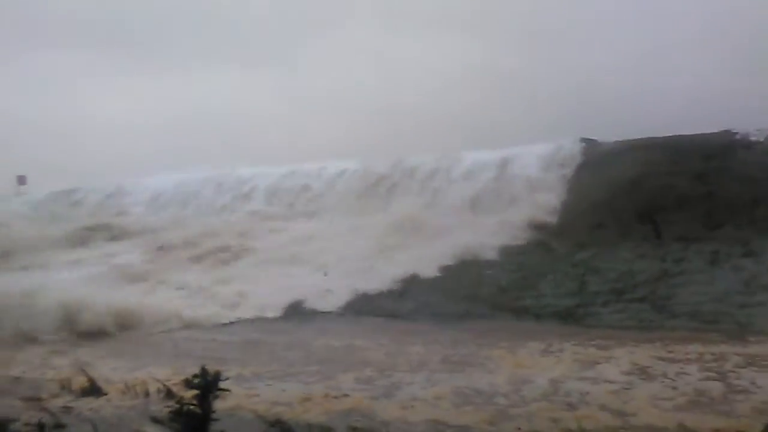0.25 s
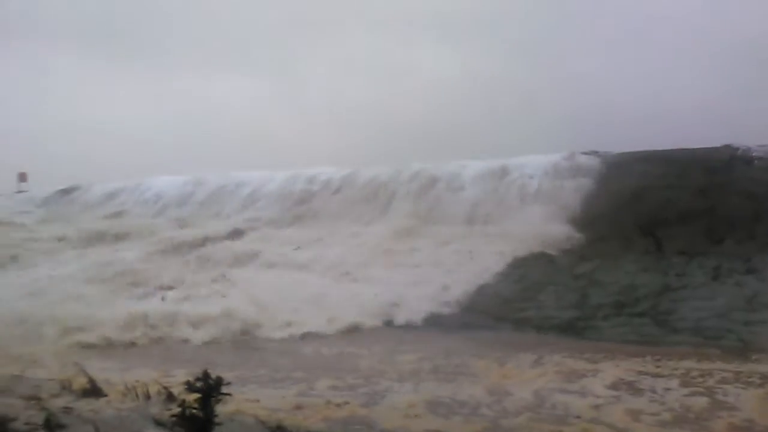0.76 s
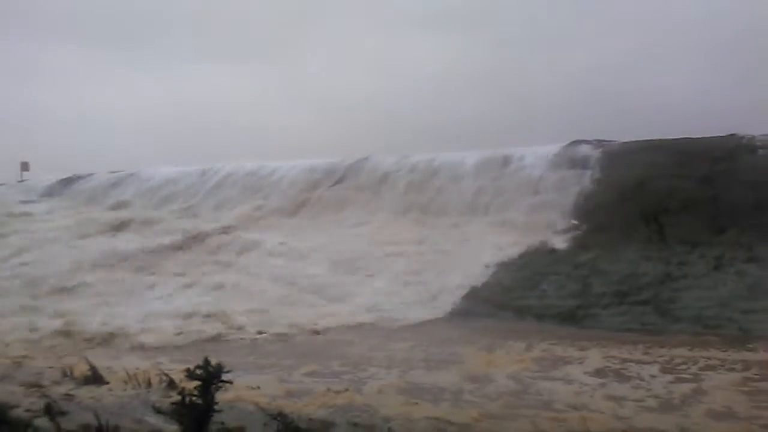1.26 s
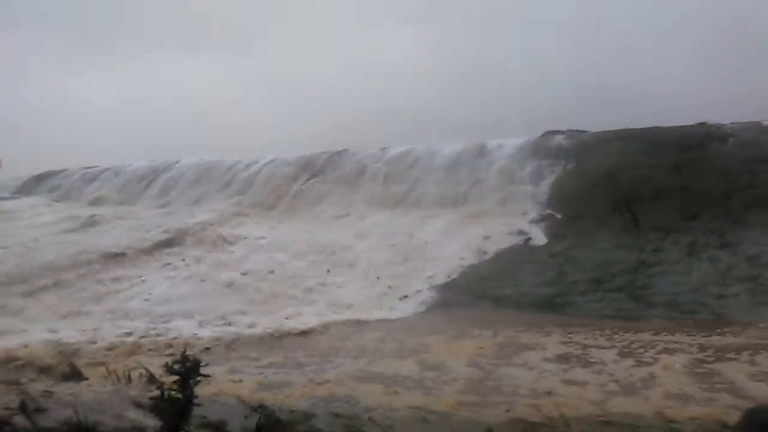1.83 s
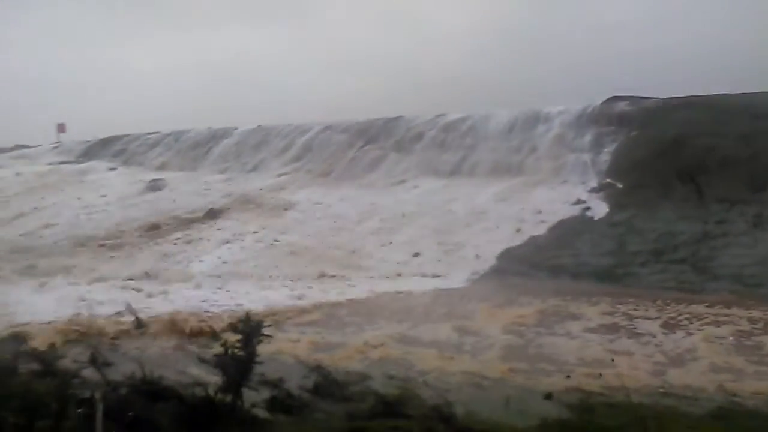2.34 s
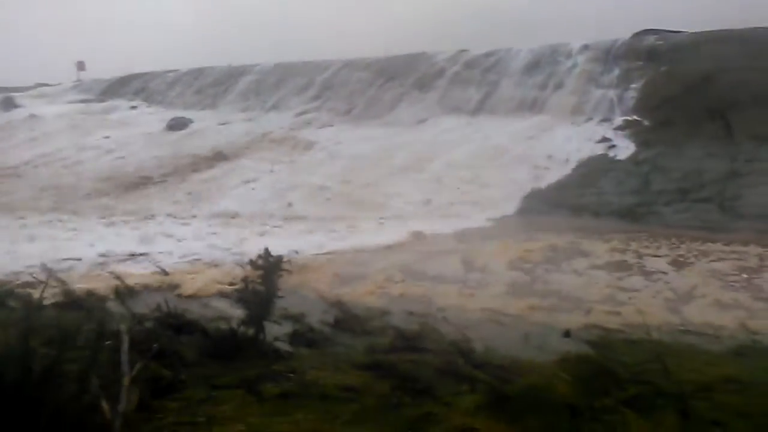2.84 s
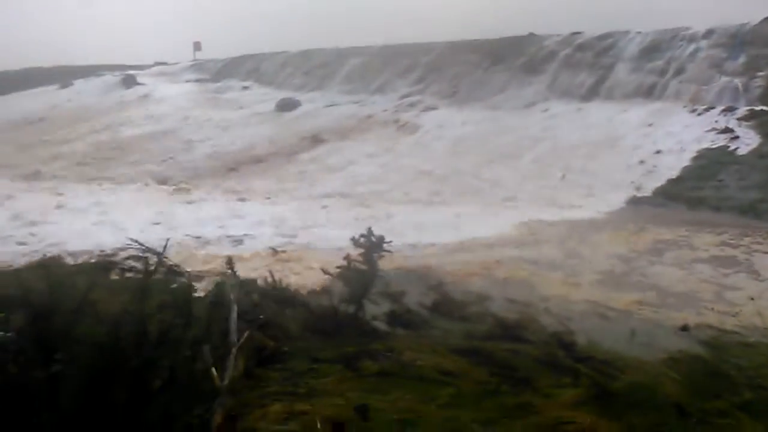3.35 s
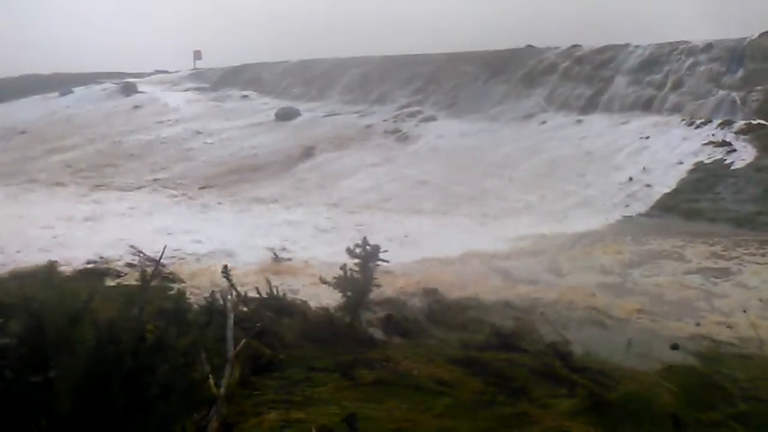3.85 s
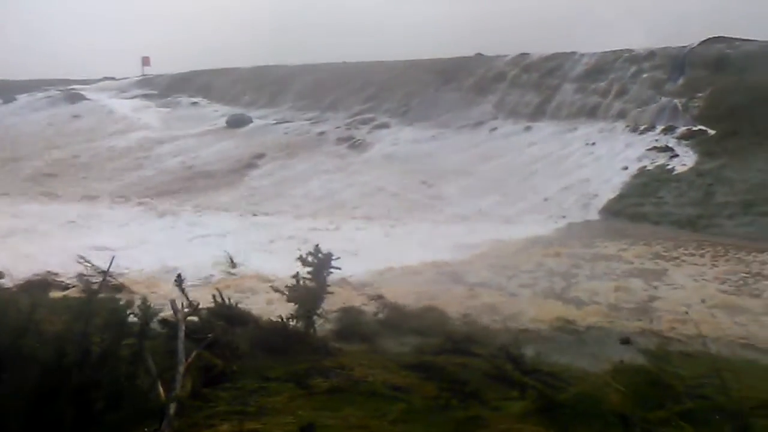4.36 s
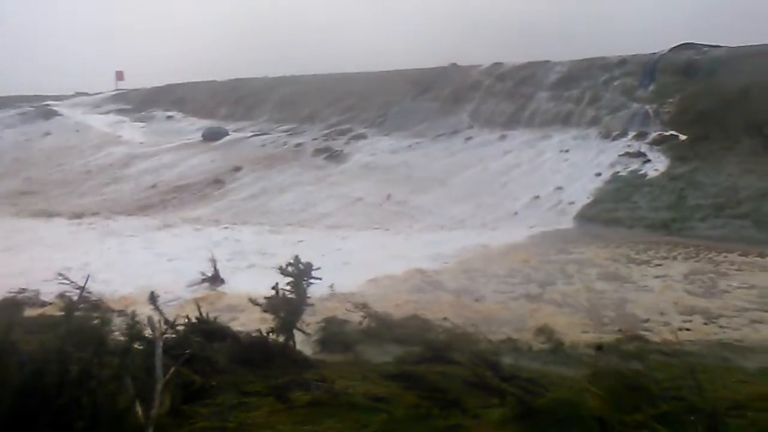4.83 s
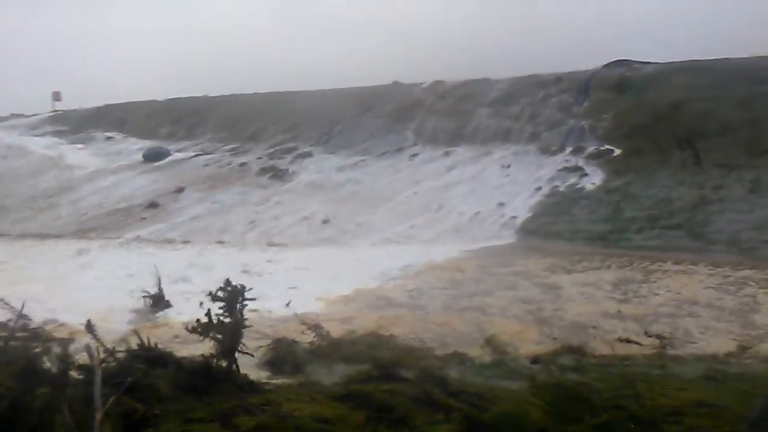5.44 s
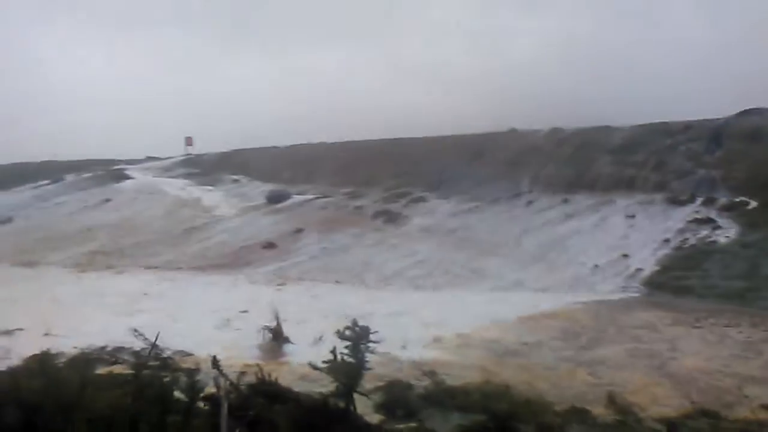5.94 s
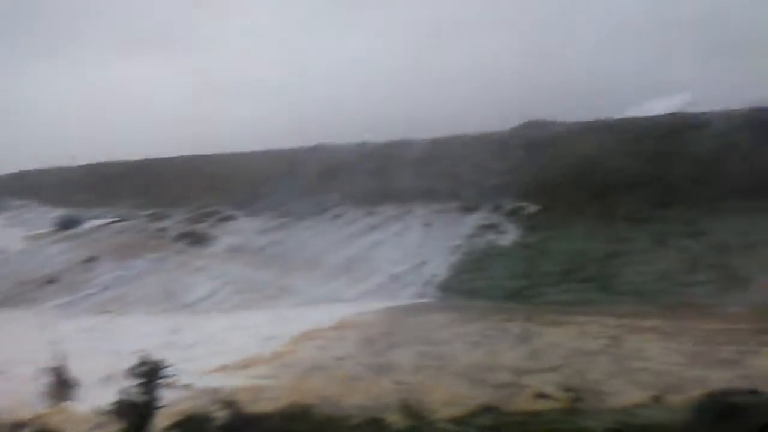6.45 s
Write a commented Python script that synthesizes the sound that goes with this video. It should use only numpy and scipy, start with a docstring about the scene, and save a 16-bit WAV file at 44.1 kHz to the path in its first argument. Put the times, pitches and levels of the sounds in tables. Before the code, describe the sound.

Storm wind strikes an unprotected outdoor microphone beside a sea wall. Deep buffeting and muffled roar run continuously, with a hollow hiss of overflowing water at the start that tears and fades. Short gusts thump and briefly hoot; from about three seconds the overload becomes frequent, choking the sound for milliseconds with clicks. Fine spray ticks and fizzes, and the wind grows brighter and rougher at the end.

```python
"""A gale on a sea wall at a bare microphone: wind noise is random noise shaped in spectrum and level.
Overflow hisses down the wall at first, tears at about half a second and drains away. Brief pitched
swells of wind noise come within gusts throughout. Slow pressure surges drive the input stage to its rail,
where sound stalls for some milliseconds, most often from 3.2 s on; the bass cut and a narrow phase filter
ring after it. Spray ticks and fizzes all along; towards the end the eddies and the upper wind band rise."""
import sys
import numpy as np
from scipy import signal
from scipy.fft import rfft, irfft, next_fast_len
from scipy.io import wavfile
from scipy.ndimage import uniform_filter1d, map_coordinates

SR = 44100
rng = np.random.default_rng(int(sys.argv[2]) if len(sys.argv) > 2 else 0)


def transcribe(signal):
    """Save signal, clipped to [-1, 1], as a 16-bit WAV file at the path in sys.argv[1]."""
    frames = np.atleast_2d(signal).T
    limited = np.clip(frames, -1, 1)
    pcm = np.round(limited * 32767).astype(np.int16)
    wavfile.write(sys.argv[1], SR, pcm)


N = 295161

RAIL = 0.4  # amplitude at which the input stage saturates


def amp(db):
    """Level law: 20 dB is a tenfold amplitude."""
    return 10 ** (np.asarray(db) / 20)


def unit(x):
    """Normalization to an rms of 1."""
    return x / np.sqrt(np.mean(x ** 2) + 1e-20)


def wobble(rate):
    """Spline interpolation: a smooth random curve through normal draws, rate knots a second."""
    knots = rng.standard_normal(int(N * rate / SR) + 4)
    return map_coordinates(knots, [np.arange(N) * rate / SR])


def filtered(x, response):
    """Linear filtering: the spectrum of x times a complex response of frequency."""
    m = next_fast_len(N + SR // 2)  # padded, so that ringing does not wrap round
    hz = np.fft.rfftfreq(m, 1 / SR)
    return irfft(rfft(x, m) * response(hz), m)[..., :N]


def rush(spectrum, patchy_db, lumps_db):
    """Turbulence as shaped noise of rms 1: random gain in patches of time and pitch, under fast level lumps."""
    z = signal.stft(rng.standard_normal(N), nperseg=512)[2]
    field = uniform_filter1d(rng.standard_normal(z.shape), 6, 0)  # over frequency
    field = uniform_filter1d(field, 8, 1)  # over time
    noise = signal.istft(z * amp(patchy_db * unit(field)), nperseg=512)[1][:N]
    f, db = np.transpose(spectrum)

    def response(hz):
        return amp(np.interp(np.log(hz + 1), np.log(f), db, left=-120))

    return unit(amp(lumps_db) * filtered(noise, response))


def controls():
    """Addition of levels: buffeting, eddies and upper band between gusts, and the gusts' lifts, all in dB."""
    # Wind noise between gusts: (time [s], buffeting [dB], eddies [dB], upper band [dB])
    calm = [(0, -14, -30.5, -44.5), (.25, -13.5, -29, -47), (.65, -13, -25.5, -41.5),
            (.85, -13.5, -27, -48), (1.3, -14, -29, -46.5), (1.6, -13.5, -26.5, -49),
            (1.9, -14.5, -28, -52.5), (2.4, -13.5, -27, -49), (2.75, -14, -28.5, -46.5),
            (3.07, -14, -29, -55), (3.45, -14, -28.5, -52), (3.95, -13, -27, -44.5),
            (4.38, -15, -30.5, -47.5), (4.7, -13, -24, -49.5), (5.0, -15, -28.5, -46.5),
            (5.36, -14.5, -30, -51.5), (5.65, -15.5, -29, -49), (6.1, -12.5, -25.5, -41),
            (6.69, -13.5, -21, -38)]
    # Bell-shaped gusts: (time [s], lift of the rush [dB], lift of the fine spray [dB], half length to 1/e [ms])
    gusts = [(.2, 2, -1, 60), (.44, 7.5, 10, 37), (0.561, 3, 5, 32), (.76, 1.5, 10, 35), (.94, 4, 3, 36),
             (1.22, 2, 1, 30), (1.551, 1.5, 1, 35), (1.68, 1.5, 6, 30), (1.82, 3, 4, 37), (1.982, 6, 6, 63),
             (2.259, 1.5, 1, 45), (2.446, 2.5, -3, 10), (2.52, 2, 13, 28), (2.87, 5, 1, 30),
             (3.015, 2.5, 4, 13), (3.16, 11, 19, 16.4), (3.3, 7.5, 22, 8.8), (3.335, 5, 6, 21),
             (3.475, 5, 5, 12), (3.53, 1, 3, 21), (3.62, 4.5, 9, 16), (3.66, 3, 7, 14),
             (3.763, 9.5, 14, 15), (3.98, -0.5, 9, 36), (4.143, 8, 15, 35), (4.3, 2, 12, 33),
             (4.58, 6, 18, 48), (4.73, 0.5, 9, 14), (4.891, 3, 4, 24), (5.0, 5.5, 15, 123),
             (5.29, 5.5, 12, 29), (5.454, 6.5, -1, 14), (5.549, 6.5, 4, 49), (5.73, 4, 5, 77),
             (5.941, 2, 11, 10), (5.97, 5.5, 3, 10), (5.984, 4.5, 12, 60), (6.239, 3.5, 9, 19),
             (6.305, 3, 6, 9.3), (6.335, 3.5, -1, 12), (6.385, 4.5, 10, 40), (6.49, -3.5, 8, 14),
             (6.56, 1.5, 5, 25), (6.625, 2.5, 2, 8.5)]
    t = np.arange(N) / SR
    s, *levels = np.transpose(calm)
    lifts_db = 0
    for at, *db, ms in gusts:
        bell = np.exp(-((t - at) / (max(ms, 5) / 1000)) ** 2)
        lifts_db = lifts_db + np.outer(db, bell)
    return *(np.interp(t, s, c) for c in levels), *lifts_db


def gale():
    """Flow noise: buffeting, small eddies and a hissing upper band; shared modulation shakes the last two."""
    # Relative spectra of the three bands: (frequency [Hz], density [dB per Hz])
    buffet_spectrum = [(15, -23), (30, -6), (45, 5.5), (80, -0.5), (150, -5), (300, -20.5), (600, -67.5)]
    eddies_spectrum = [(100, -6.5), (250, 0.5), (400, -2.5), (550, -6.5), (750, -9), (1000, -16),
                       (1500, -25), (3000, -33), (8000, -47.5), (15000, -64.5)]
    upper_spectrum = [(600, -27), (1100, 7.5), (1750, 2.5), (2300, -1.5), (3300, -2), (4300, -2),
                      (5200, -9), (7000, -20.5), (10000, -30), (15000, -35)]
    buffet_sway_db = 2  # random sway of the buffeting
    buffet_lift, upper_lift = 0.35, 1.03  # shares of a gust's lift in dB
    stiffness = .55  # how soon the diaphragm stiffens, per rms of the buffeting

    buffet_db, eddies_db, upper_db, lift_db, _ = controls()
    slow, quick = wobble(16), wobble(60)  # passing eddies

    buffet_lumps_db = 1.6 * wobble(24) + buffet_sway_db * wobble(9)
    buffet = rush(buffet_spectrum, patchy_db=1.0, lumps_db=buffet_lumps_db)
    buffet = unit(np.tanh(stiffness * buffet))  # the diaphragm stiffens under big pushes

    eddies_lumps_db = 0.5 * slow + 1.28 * quick + 1.3 * wobble(200)
    eddies = rush(eddies_spectrum, patchy_db=2.0, lumps_db=eddies_lumps_db)

    upper_lumps_db = 1.0 * slow + 1.7 * quick + 3.04 * wobble(300)
    upper = rush(upper_spectrum, patchy_db=2.0, lumps_db=upper_lumps_db)

    buffet = amp(buffet_db - .5 + buffet_lift * lift_db) * buffet
    eddies = amp(eddies_db + lift_db) * eddies
    upper = amp(upper_db + upper_lift * lift_db) * upper
    return buffet + eddies + upper


def surges(sound):
    """Overload by pressure below hearing: random sway, and surges that lean to a rail and pin the bass there."""
    # Surges that hit a rail: (time [s], length [ms], side [+1 upper rail, -1 lower rail])
    stalls = [(0.1651, 5.0, -1), (0.4037, 2.5, -1), (0.4432, 3.0, 1), (0.4754, 4.5, 1), (0.4935, 3.0, -1),
              (0.5448, 4.0, 1), (0.798, 7.0, 1), (0.8202, 3.0, -1), (0.8331, 4.5, 1), (0.8404, 3.0, 1),
              (0.8452, 3.5, 1), (1.1539, 7.0, 1), (1.4991, 4.5, -1), (1.5834, 5.0, -1), (1.6283, 4.5, 1),
              (1.9008, 3.5, 1), (2.1092, 5.5, -1), (3.1836, 3.5, -1), (3.1912, 14.5, 1), (3.2705, 2.5, 1),
              (3.278, 15.5, 1), (3.3105, 9.5, -1), (3.3803, 8.0, -1), (3.4019, 3.0, 1), (3.4445, 3.0, 1),
              (3.4537, 6.0, -1), (3.4891, 5.5, 1), (3.5543, 3.0, -1), (3.561, 2.5, -1), (3.6745, 3.0, -1),
              (3.7136, 5.5, 1), (3.7974, 4.5, 1), (3.8083, 5.5, 1), (3.8143, 5.0, 1), (3.8445, 3.5, -1),
              (4.1595, 4.5, -1), (4.2785, 4.0, -1), (4.326, 3.0, 1), (4.3676, 19.5, 1), (4.3946, 3.0, -1),
              (4.4474, 14.0, -1), (4.4868, 5.0, 1), (4.4988, 5.0, 1), (4.535, 4.0, -1), (4.5445, 2.5, -1),
              (4.5765, 2.5, 1), (4.6196, 3.5, 1), (4.6341, 3.5, 1), (4.6486, 5.5, 1), (4.7124, 4.0, -1),
              (4.741, 2.5, 1), (4.791, 2.5, 1), (4.8635, 3.0, -1), (4.913, 2.5, -1), (4.956, 4.5, 1),
              (4.9805, 2.5, 1), (4.9945, 2.5, 1), (5.012, 2.5, 1), (5.029, 2.5, -1), (5.079, 2.5, 1),
              (5.2436, 8.5, -1), (5.3382, 2.5, 1), (5.3547, 3.0, -1), (5.3808, 4.0, 1), (5.4142, 4.0, 1),
              (5.5931, 2.5, 1), (5.6063, 11.5, 1), (5.7764, 11.0, 1), (5.8482, 5.0, -1), (5.8727, 5.0, -1),
              (5.9001, 25.75, -1), (5.927, 11.2, -1), (5.9436, 18.2, -1), (5.9855, 3.5, 1),
              (5.9975, 2.5, 1), (6.003, 2.5, 1), (6.1246, 3.5, -1), (6.1361, 4.0, -1), (6.1461, 2.5, 1),
              (6.1775, 6.0, 1), (6.1934, 7.5, 1), (6.2244, 5.0, 1), (6.2696, 2.5, 1), (6.2877, 8.0, 1),
              (6.3108, 5.5, 1), (6.3197, 6.5, 1), (6.3468, 11.5, 1), (6.403, 2.5, 1), (6.4675, 4.5, 1),
              (6.4799, 3.0, 1), (6.5023, 2.5, -1), (6.5102, 5.0, 1), (6.5297, 5.5, 1), (6.6095, 6.5, -1)]
    longest_lean_ms = 30  # longest approach to a rail
    t, lean, pin = np.arange(N) / SR, np.zeros(N), np.zeros(N)
    for s, ms, side in stalls:
        near = slice(max(round((s - .04) * SR), 0), round((s + .07) * SR))
        away = np.maximum(s - t[near], t[near] - s - ms / 1000)  # seconds outside the stall
        approach = np.clip(away * 1000 / min(longest_lean_ms, 4 * ms), 0, 1)
        lean[near] += side * np.cos(np.pi / 2 * approach) ** 2
        grip = np.clip(.75 - away / .0018, 0, 1)
        pin[near] = np.where(grip > np.abs(pin[near]), side * grip, pin[near])
    lean = uniform_filter1d(np.clip(lean, -1, 1), SR // 150)
    sway = RAIL * (.25 * lean + (1 - np.abs(lean)) * .1 * wobble(60))
    bass = uniform_filter1d(sound, SR // 600)
    treble = sound - bass
    leaning_bass = (1 - .3 * np.abs(lean)) * bass + sway
    return treble + (1 - np.abs(pin)) * leaning_bass + 1.5 * RAIL * pin  # pinned beyond the rail


def pitched_swells():
    """Phase-roughened short tones under bell envelopes; also gives how far they fill each moment."""
    # Brief swells in gusts: (time of crest [s], envelope peak [dB], pitch [Hz], fade to 1/e [cycles])
    swells = [(0.434, -19.5, 750, 5.6), (0.436, -10, 170, 1.4), (0.727, -15.5, 160, 1.5),
              (0.809, -26, 735, 2), (1.556, -15.5, 490, 2), (1.79, -12, 150, 1.6), (2.44, -19.5, 610, 2.3),
              (2.448, -13.5, 149, 1.7), (2.516, -18, 555, 2), (2.883, -19, 800, 1.9),
              (3.007, -19, 600, 1.3), (3.143, -14, 387, 2.4), (3.157, -14, 295, 2.5), (3.166, -9, 148, 2.5),
              (3.298, -24, 710, 2.3), (3.35, -13, 170, 1.2), (3.763, -35, 1900, 6.7),
              (3.774, -10.5, 138, 2.7), (3.805, -20, 650, 1.2), (4.128, -13, 450, 1.2),
              (4.15, -6, 190, 1.1), (4.172, -10.5, 198, 1.8), (4.59, -12.5, 140, 2.1),
              (4.725, -19.5, 650, 2), (4.885, -17.5, 480, 2.2), (5.296, -24, 590, 4.9),
              (5.445, -21, 666, 2), (5.475, -18, 482, 2), (5.771, -25, 510, 1.8), (5.9405, -15, 130, 0.61),
              (5.9406, -16, 400, 1.8), (5.973, -9.5, 150, 0.83), (5.994, -5, 140, 0.86),
              (5.9405, -27, 1390, 3.6), (6.302, -18.5, 480, 2), (6.335, -18, 650, 1.8),
              (6.484, -21, 820, 2), (6.619, -19, 480, 1.5)]
    rise_share = 0.49  # the rise is this share of the fade
    lead = SR // 20  # samples kept ahead of the crest
    out, filled, t = np.zeros(N + SR), np.zeros(N + SR), np.arange(-lead, lead) / SR
    for s, db, hz, cycles in swells:
        # a random walk of phase roughens the tone
        drift = np.cumsum(uniform_filter1d(rng.standard_normal(len(t)), size=60)) * .03
        side = np.where(t < 0, rise_share, 1)
        shape = amp(db) * np.exp(-(t * hz / cycles / side) ** 2)
        start = round(s * SR) - lead
        out[start:][:len(t)] += shape * np.sin(2 * np.pi * hz * t + drift)
        filled[start:][:len(t)] += shape / RAIL
    return out[:N], np.clip(filled[:N], 0, 1)


def pour():
    """Band-limited flow noise: the overflow hisses, tears, and thins out exponentially as the wave drains."""
    # Relative spectrum of the hollow hiss: (frequency [Hz], density [dB per Hz])
    sheet = [(1150, -27.5), (1450, -3), (1750, 0), (2100, -7), (2600, -28.5)]
    full_db, drain_db_per_s = -42, 6  # level while it runs full, loss as it drains
    break_s, break_db = .47, 3.5  # when the sheet tears, and its loss over the next 30 ms
    late = np.arange(N) / SR - break_s
    torn_db = break_db * np.clip(late / .03, 0, 1)
    level_db = full_db - torn_db - drain_db_per_s * np.maximum(late, 0)
    return amp(level_db) * rush(sheet, patchy_db=1.5, lumps_db=1.5 * wobble(25))


def fizz():
    """Amplitude-modulated treble noise: fine spray in spits that follows the upper wind band and the gusts."""
    # Relative spectrum of the crackle: (frequency [Hz], density [dB per Hz])
    mist = [(4000, -30.5), (6500, -7.5), (9000, -7.5), (12000, -2), (13500, -1.5), (14800, -17)]
    mean_db, growth = -62.5, 0.61  # mean level between gusts; its swing in dB over that of the upper band
    *_, upper_db, _, lift_db = controls()
    spit_lumps_db = 1.5 * wobble(14) + 1.5 * wobble(30) + 5 * wobble(400)
    spits = rush(mist, patchy_db=.8, lumps_db=spit_lumps_db)
    return amp(mean_db + growth * (upper_db - upper_db.mean()) + lift_db) * spits


def spray():
    """Impact excitation of the housing: each drop is a soft noise splat and a brief decaying ring."""
    # Drops on the housing: (time [s], level before a common 4.5 dB lift [dB], pitch [Hz])
    drops = [(0.2992, -31.5, 3740), (0.7731, -33, 3340), (1.2244, -36, 4380), (1.348, -33, 3730),
             (2.149, -35, 3720), (2.5227, -29, 4420), (2.5561, -35, 3620), (2.835, -33.5, 4570),
             (3.268, -37, 2800), (3.361, -43, 5030), (3.439, -49, 7800), (3.531, -42, 6260),
             (3.614, -42, 6800), (3.67, -45, 7000), (3.738, -45, 7300), (3.9629, -31, 4200),
             (4.223, -43, 6500), (4.232, -39, 4700), (4.5096, -32, 3700), (4.521, -31, 4370),
             (4.559, -34, 6500), (4.871, -40, 4300), (4.7855, -32, 3780), (5.0365, -32, 3130),
             (5.991, -37, 3500), (5.991, -36, 4600)]
    out, t = np.zeros(N + SR), np.arange(SR // 50) / SR
    # 90 fainter drops at random, in the same columns
    faint = rng.uniform([0, -52, 3000], [N / SR, -42, 7500], size=(90, 3))
    for s, db, hz in [*drops, *faint]:
        ring = amp(-60 * t / .009) * np.sin(2 * np.pi * hz * t)  # 60 dB down in 9 ms
        grain = uniform_filter1d(rng.standard_normal(len(t)), size=3)
        splat = 0.6 * amp(-60 * t / 0.024) * grain
        onset = 1 - np.exp(-t / 0.0001)
        out[round(s * SR):][:len(t)] += amp(db + 4.5) * onset * (ring + splat)
    return out[:N]


def scene():
    """Superposition of all sources, under the surges; pitched swells partly replace the steady wind noise."""
    replaced = 0.33  # share of the steady noise replaced where a swell fills the moment
    swells, filled = pitched_swells()
    wind = (1 - replaced * filled) * gale()
    return surges(wind + swells + pour() + fizz() + spray())[None]


def record(dry):
    """Saturation, then linear filters that ring after each stall, level compression and the band limit."""
    hiss = amp(-63.0) * np.diff(rng.standard_normal(N + 1))  # the amplifier's own thin hiss
    held = np.clip(dry, -RAIL, RAIL) + hiss
    cut = signal.sosfilt(signal.butter(5, 53, "high", fs=SR, output="sos"), held)

    def phase_lag(hz):  # narrow all-pass, which rings near 4 kHz
        return (4080 ** 2 - hz ** 2 - 1j * hz * 130) / (4080 ** 2 - hz ** 2 + 1j * hz * 130)

    def dull_top(hz):  # resonant low-pass at 5200 Hz, then a gentle one at 6000 Hz
        return 1 / (1 - (hz / 5200) ** 2 + 1j * hz / 5200 / 1.16) / (1 + 1j * hz / 6000)

    voiced = filtered(cut, lambda hz: phase_lag(hz) * dull_top(hz))
    loudness = np.sqrt(np.abs(uniform_filter1d(voiced ** 2, SR // 25)))  # rms over 40 ms
    even = voiced / (1 + (loudness / 0.1) ** 2) ** 0.12 * amp(1.0)  # loud moments are turned down
    band_limit = signal.ellip(14, .5, 85, 14550, fs=SR, output="sos")  # top at 14550 Hz
    return signal.sosfilt(band_limit, even)


dry = scene()
out = record(dry)
transcribe(out)
```